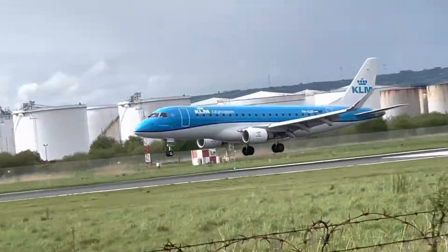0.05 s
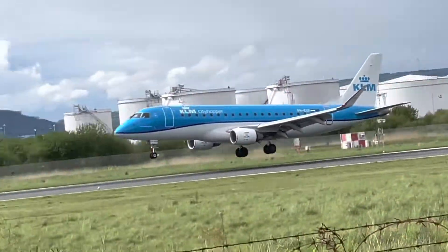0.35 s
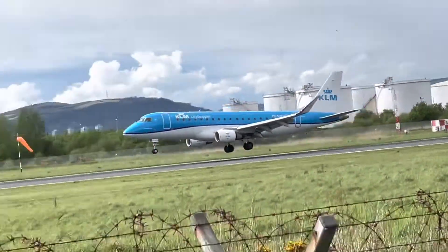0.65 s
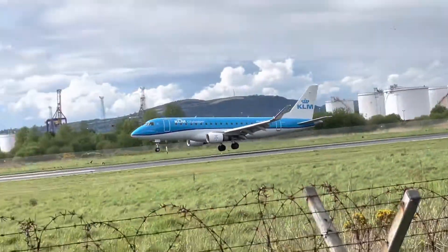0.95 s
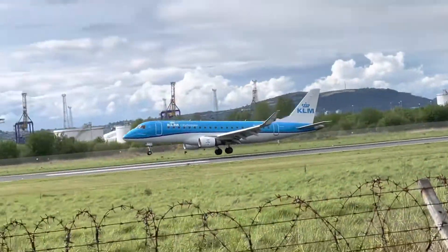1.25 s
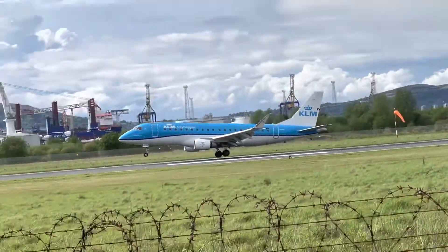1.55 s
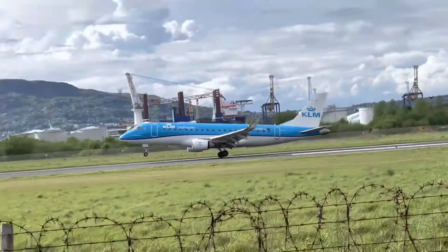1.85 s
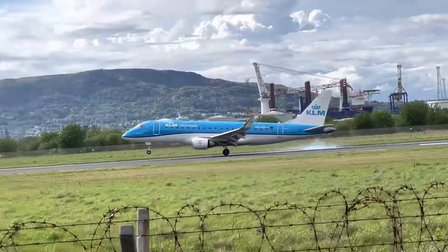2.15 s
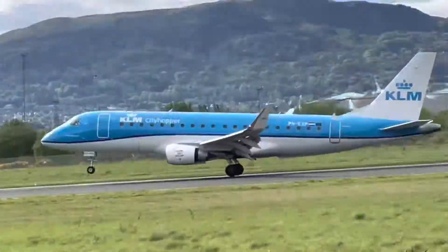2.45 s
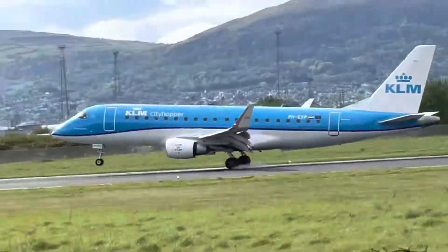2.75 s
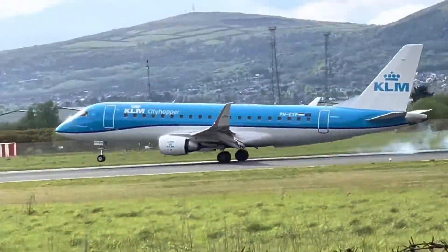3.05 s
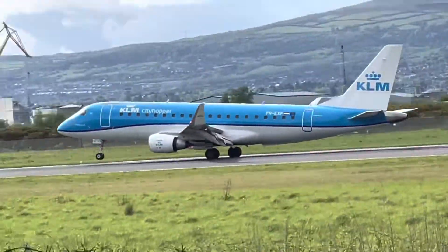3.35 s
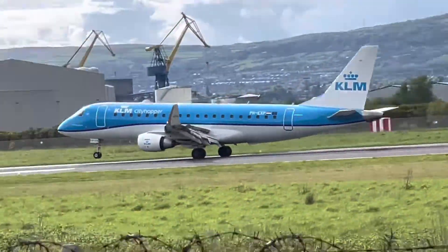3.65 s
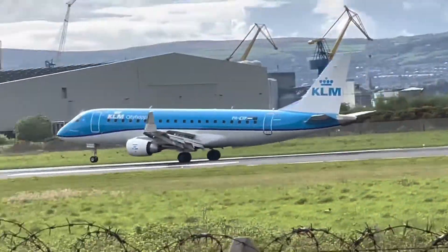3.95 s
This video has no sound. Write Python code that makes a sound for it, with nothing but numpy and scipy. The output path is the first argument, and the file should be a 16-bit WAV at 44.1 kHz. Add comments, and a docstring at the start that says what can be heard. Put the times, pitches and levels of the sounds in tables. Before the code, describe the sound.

A jet airliner roars throughout as it lands, heard from beside the runway, with faint high engine tones at first. From about 1 second a wavering whine slides down in pitch until the end at 4 seconds, while the roar swells a little and darkens. Wind rumbles on the microphone, with low buffeting gusts hardest from about 1.6 to 2.6 seconds, then easing.

```python
"""A jet airliner's roar swells over rumbling wind as it lands, heard from the grass by the runway.
The broadband noise of fans and exhaust darkens as it goes by, rippled by interference with the
ground echo, while the Doppler effect slides the engines' whine downward. Turbulent pressure on
the two microphone ports makes the rumble, and buffets them hardest halfway through."""
import sys
import numpy as np
from scipy import signal
from scipy.fft import rfft, irfft
from scipy.io import wavfile
from scipy.ndimage import uniform_filter1d

SR = 44100
rng = np.random.default_rng(int(sys.argv[2]) if len(sys.argv) > 2 else 0)


def dump_mix(stems):
    """Bounce the given channels to the path in sys.argv[1] as a 16-bit WAV at rate SR."""
    frames = np.atleast_2d(stems).T  # one column per channel
    limited = np.clip(frames, -1, 1)  # hard clip at full scale
    pcm = np.round(limited * 32767).astype(np.int16)
    wavfile.write(sys.argv[1], SR, pcm)


N = 176400
TIME_S = np.arange(N) / SR
ABEAM_S = .97  # the aircraft is closest to the listener


def amp(db):
    """Decibels as an amplitude ratio."""
    return 10 ** (np.asarray(db) / 20)


def unit_rms(x):
    """Normalisation to a mean power of one."""
    return x / np.sqrt(np.mean(x ** 2) + 1e-20)


def spectrum(points, hz):
    """Interpolation of a table on a logarithmic frequency axis."""
    table_hz, value = np.transpose(points)
    return np.interp(np.log(hz + 1), np.log(table_hz + 1), value)


def curve(points, t=TIME_S):
    """Linear interpolation of a table over time."""
    return np.interp(t, *np.transpose(points))


def noise(shape, size=N):
    """Spectral shaping: white noise weighted by shape(hz), at unit rms."""
    white = rfft(rng.standard_normal(size))
    return unit_rms(irfft(white * shape(np.fft.rfftfreq(size, 1 / SR)), size))


def wander(rate_hz):
    """Random modulation: Gaussian low-pass noise."""
    return noise(lambda hz: np.exp(-.5 * (hz / rate_hz) ** 2))


def add(mix, start_s, sound):
    """Superposition of a sound on the mix from start_s on."""
    part = mix[..., round(start_s * SR):][..., :sound.shape[-1]]
    part += sound[..., :part.shape[-1]]


# Faint ticks close by: start_s, level_db
TICKS = [(.4955, -42), (.506, -53), (.6325, -47)]

def ticks(pitch_hz=13300, decay_s=.00022):
    """Damped oscillation: each tick is a very short, high ring."""
    t, out = np.arange(256) / SR, np.zeros(N)
    ring = t / decay_s * np.exp(1 - t / decay_s) * np.sin(2 * np.pi * pitch_hz * t)
    for start_s, level_db in TICKS:
        add(out, start_s, amp(level_db) * ring)
    return out


# Spectrum of the small eddies: frequency_hz, relative_db
RUSTLE_SPECTRUM = [(40, -12), (110, 4.5), (200, -2.5), (400, -11), (750, -6.5), (1300, -16), (2000, -90),
                   (4000, -72)]
# Strength of the small eddies: time_s, level_db
RUSTLE_LEVEL = [(0, -39), (.6, -37), (1.3, -40), (1.7, -35), (1.9, -40), (2.2, -37), (2.55, -43),
                (2.75, -43.5), (3.1, -37.5), (3.5, -40), (4, -46.5)]

def rustle(swell_db=2, swell_hz=12):
    """Incoherence: eddies smaller than the port spacing give each port its own soft rush."""
    shape = lambda hz: amp(spectrum(RUSTLE_SPECTRUM, hz))
    pair = np.array([noise(shape) * amp(swell_db * wander(swell_hz)) for port in range(2)])
    return pair * amp(curve(RUSTLE_LEVEL))


def eddies(shape, side_gain, size=N):
    """Partial coherence: turbulent pressure of steady strength, partly different at each port."""
    mid, side = noise(shape, size), noise(shape, size)
    pair = mid + side_gain * np.array([side, -side])
    local_power = uniform_filter1d((pair ** 2).mean(0), size=1600, mode="wrap")
    return pair / np.sqrt(local_power + 0.15)


# Spectrum of the deep wind rumble: frequency_hz, relative_db
RUMBLE_SPECTRUM = [(15, -46), (32, -19), (52, 6.5), (70, 2), (95, -11), (135, -18), (250, -27), (600, -68),
                   (2000, -95)]
# Strength of the rumble: time_s, level_db
RUMBLE_LEVEL = [(0, -31.5), (.6, -29.5), (.8, -33.5), (1.0, -28.5), (1.4, -30.5), (1.6, -23.5), (1.85, -35),
                (1.95, -24), (2.15, -36), (2.35, -40), (2.58, -40), (2.72, -44), (3.1, -41), (3.5, -50),
                (4, -38)]
# Strength of the wind's higher flutter: time_s, level_db
FLUTTER_LEVEL = [(0, -42), (1.2, -39), (1.6, -40), (2.15, -29), (2.35, -36), (2.55, -32.5), (2.75, -43.5),
                 (3.2, -43), (3.5, -32), (4, -49)]

def wind(flutter_hz=86.7, flutter_octaves=.32, swell_db=2, swell_hz=9, side_gain=.35):
    """Turbulent pressure on the microphone: a rumble and a higher flutter that swell together."""
    rumble_shape = lambda hz: amp(spectrum(RUMBLE_SPECTRUM, hz))
    flutter_shape = lambda hz: np.exp(-.5 * (np.log2((hz + 1) / flutter_hz) / flutter_octaves) ** 2)
    rumble = eddies(rumble_shape, side_gain) * amp(curve(RUMBLE_LEVEL))
    flutter = eddies(flutter_shape, side_gain) * amp(curve(FLUTTER_LEVEL))
    return (rumble + flutter) * amp(swell_db * wander(swell_hz))


# Gusts on the microphone: start_s, length_s, level_db, upper_edge_hz
BUFFETS = [(1.075, .045, -28, 190), (1.185, .075, -17.5, 95), (1.635, .04, -21, 90),
           (1.714, .045, -13.5, 175), (1.775, .1, -15, 70), (1.855, .06, -23.5, 80),
           (2.0, .045, -20.5, 110), (2.088, .12, -14.5, 140), (2.158, .038, -11.5, 275),
           (2.198, .066, -27, 240), (2.264, .06, -19.5, 330), (2.32, .035, -27, 280),
           (2.402, .04, -22, 350), (2.438, .08, -22, 400), (2.509, .043, -28, 280), (2.542, .045, -20, 380),
           (2.558, .06, -21, 170), (2.915, .033, -33, 200), (3.17, .04, -29, 130), (3.432, .05, -24, 169),
           (3.602, .045, -24, 170)]

def buffets(rise_s=.0059, rolloff_order=3.2):
    """Pressure transients: each gust is a burst of low turbulence that rises fast and dies away."""
    t, out = np.arange(8192) / SR, np.zeros((2, N))
    for start_s, length_s, level_db, upper_hz in BUFFETS:
        lower_hz = .36 * upper_hz
        highpass = lambda hz: hz ** 3 / (hz ** 3 + lower_hz ** 3)
        band = lambda hz: highpass(hz) / np.hypot(1, (hz / upper_hz) ** rolloff_order)
        envelope = np.minimum(t / rise_s, 1) * np.exp(-2 * (t / length_s) ** 2)
        add(out, start_s, eddies(band, side_gain=.22, size=len(t)) * amp(level_db) * envelope)
    return out


# Level difference between left and right: frequency_hz, left_minus_right_db
STEREO_BALANCE = [(60, .3), (240, .3), (390, 1), (600, 0), (720, -3), (870, -3.8), (1050, -.8), (1400, 0)]
# Phase difference between left and right: frequency_hz, left_lead_rad
STEREO_PHASE = [(250, 0), (620, -.55), (950, -.1), (1250, -.3), (1600, 0), (2450, 0), (3100, .55),
                (4500, .32), (5300, .45), (5750, -1.55), (6700, -.8), (7200, -1.15), (7550, -2.3),
                (8000, -2.3), (8700, -3.14), (9400, -3.55), (11500, -5), (12600, -6.28)]

def stereo_image(sound):
    """Stereo image: level and phase differ left and right, varying with frequency."""
    hz = np.fft.rfftfreq(N, 1 / SR)
    left = amp(spectrum(STEREO_BALANCE, hz) / 2) * np.exp(.5j * spectrum(STEREO_PHASE, hz))
    return irfft(rfft(sound) * np.array([left, 1 / left]), N)


# Fan tones from ahead of the engines: start_s, length_s, pitch_hz, fall_hz_per_s, level_db
APPROACH_TONES = [(0, 0.49, 1180, 45, -38.5), (.2, .36, 3140, 400, -44), (.63, .14, 3275, 500, -39),
                  (.76, .16, 3310, 500, -44), (1.08, .32, 3080, 340, -47)]

def approach_tones(width_hz=12):
    """Forward radiation of the fans: brief, blurred tones that swell, sink in pitch and fade."""
    out = np.zeros(N)
    for start_s, length_s, pitch_hz, fall_hz_per_s, level_db in APPROACH_TONES:
        age_s = TIME_S - start_s
        cycles = np.cumsum(pitch_hz - fall_hz_per_s * age_s + width_hz * wander(2 * width_hz)) / SR
        envelope = np.sin(np.pi * np.clip(age_s / length_s, 0, 1))
        out += amp(level_db) * envelope * unit_rms(np.sin(2 * np.pi * cycles))
    return out


def blade_tone(cycles, width_hz, broadening, fading_db=2.8, fading_hz=35):
    """Scintillation: the air on the way blurs a tone's pitch and makes its level flutter."""
    jitter = np.cumsum(broadening * width_hz * wander(3 * width_hz)) / SR
    fading = amp(fading_db * wander(fading_hz))
    return unit_rms(fading * np.sin(2 * np.pi * (cycles + jitter)))


# Fan tones of the two engines: pitch_ratio, relative_db, base_width_hz
FAN_TONES = [(1, 0, 5), (1.044, -10.5, 7)]
# Strength of the fan tones: time_s, level_db
FAN_LEVEL = [(0, -72), (.87, -62), (.97, -43.5), (1.07, -54), (1.2, -44), (1.35, -44.5), (1.42, -35.5),
             (1.51, -41), (1.66, -40.5), (1.76, -45), (1.86, -41), (1.93, -54), (2.02, -37.5), (2.13, -50),
             (2.25, -37), (2.37, -57), (2.43, -36), (2.51, -46), (2.57, -37.5), (2.66, -45), (2.88, -50),
             (3.0, -38.5), (3.19, -57), (3.245, -30.5), (3.28, -33), (3.34, -45), (3.4, -37.5),
             (3.47, -36.5), (3.53, -48), (3.6, -37.5), (3.69, -45), (3.75, -38.5), (3.93, -36.3), (4, -46)]
# Pitch of the turbine's thin whistle over that of the whine: time_s, pitch_ratio
TURBINE_RATIO = [(2.1, 2.473), (2.6, 2.513), (3.0, 2.52), (3.4, 2.506), (3.85, 2.48)]
# Strength of that whistle: time_s, level_db
TURBINE_LEVEL = [(0, -80), (1.9, -77), (2.12, -62), (2.4, -68), (2.6, -56.5), (2.85, -68), (3.2, -66),
                 (3.4, -56.5), (3.6, -57), (3.72, -65), (4, -61)]
# Hoarse haze of scattered sound around the whine: time_s, level_db
HAZE_LEVEL = [(0, -73), (1.0, -51), (1.3, -50), (1.45, -35), (1.6, -46), (1.85, -42.5), (2.15, -48),
              (2.26, -34), (2.36, -56), (2.6, -47), (2.88, -45), (3.0, -52), (3.16, -54), (3.28, -39),
              (3.6, -51), (4, -48)]

def whine(abeam_hz=3587, doppler_swing=.265, distance_over_speed_s=1.25, haze_width_hz=210):
    """Doppler effect: fan tones, their haze and the turbine's whistle share one falling glide."""
    along = (TIME_S - ABEAM_S) / distance_over_speed_s
    pitch_hz = abeam_hz * (1 - doppler_swing * along / np.hypot(1, along))
    cycles = np.cumsum(pitch_hz) / SR
    broadening = 1 + 2.6 / (1 + along ** 2) ** 1.49  # tones blur most abeam
    fan = sum(amp(db) * blade_tone(ratio * cycles, width_hz, broadening)
              for ratio, db, width_hz in FAN_TONES)
    turbine_cycles = np.cumsum(pitch_hz * curve(TURBINE_RATIO)) / SR
    turbine = blade_tone(turbine_cycles, width_hz=15, broadening=broadening)
    phase = 2 * np.pi * cycles
    haze = unit_rms(wander(haze_width_hz) * np.sin(phase) + wander(haze_width_hz) * np.cos(phase))
    return (fan * amp(curve(FAN_LEVEL))
            + haze * amp(curve(HAZE_LEVEL))
            + turbine * amp(curve(TURBINE_LEVEL)))


def ground_echo_db(t, hz, delay_s=.00334, drift_s_per_s=.00019, depth_db=2, edge_hz=890):
    """Comb filtering: direct and ground-reflected sound interfere, rippling the low spectrum."""
    ripple = np.cos(2 * np.pi * hz * (delay_s + drift_s_per_s * t))
    return depth_db * ripple * np.exp(-.5 * (hz / edge_hz) ** 2)


# Strength of the howl in the roar: time_s, boost_db
HOWL_BOOST = [(0, 0.5), (1.1, 3), (1.6, 4.5), (2, 4), (2.3, 5.8), (2.75, 7.3), (3.3, 4.5), (4, 1)]

def howl_db(t, hz, abeam_hz=1040, fall_hz_per_s=54, width_hz=124):
    """Band emphasis: a broad, sinking peak in the noise spectrum is heard as a howl."""
    centre_hz = abeam_hz - fall_hz_per_s * (t - ABEAM_S)
    return curve(HOWL_BOOST, t) * np.exp(-.5 * ((hz - centre_hz) / width_hz) ** 2)


# The roar's six bands, low to high: centre_hz
BAND_CENTRES = [130, 420, 1000, 2000, 5500, 11000]
# Deep exhaust rumble, growing behind the aircraft: time_s, relative_db
DEEP_BAND = [(0, -7), (1.3, -2), (2.2, 5), (2.55, 2), (2.75, -2), (3.1, 7), (3.5, 10), (4, -8)]
# Low roar of the exhaust: time_s, relative_db
EXHAUST_BAND = [(0, -33), (.3, -33.5), (.6, -29.5), (1.4, -30.5), (2.2, -29), (2.75, -35), (3.15, -33.5),
                (3.5, -25), (3.7, -29.5), (4, -28)]
# The next three bands, each on its own relative scale: time_s, middle_db, upper_middle_db, treble_db
MIDDLE_BANDS = [(0.0, -42.5, -39, -57), (0.07, -35.5, -39, -53.5), (0.23, -38, -33, -42),
                (0.29, -37, -30.5, -46.5), (0.46, -36.5, -35, -46), (0.55, -33.5, -29.5, -43.5),
                (0.57, -36, -30.5, -41.5), (0.62, -34.5, -32, -47.5), (0.68, -36.5, -31.5, -44),
                (0.8, -33, -34, -50.5), (0.94, -34.5, -34.5, -47.5), (1.1, -32.5, -35, -52),
                (1.4, -31.5, -31.5, -48), (1.62, -30, -34, -48), (1.83, -33, -38.5, -56),
                (2.13, -30.5, -35.5, -48), (2.21, -32, -35, -51), (2.23, -32, -34, -50),
                (2.24, -27.5, -36, -46.5), (2.27, -29, -31, -48.5), (2.31, -33, -36, -52),
                (2.43, -30.5, -36.5, -50), (2.64, -32.5, -35, -49), (2.7, -30, -34, -49),
                (2.73, -32, -35, -52.5), (2.9, -32, -36, -49), (2.92, -35, -37, -55.5),
                (3.06, -33, -35.5, -49), (3.12, -35, -39, -55.5), (3.29, -29, -33, -48.5),
                (3.37, -34, -35.5, -52), (3.5, -30.5, -32.5, -53), (3.57, -31, -40, -51),
                (3.63, -27.5, -34.5, -53), (3.64, -30.5, -37, -54), (3.97, -33, -40.5, -51.5)]
# Highest hiss: time_s, relative_db
HISS_BAND = [(0, -6), (.25, 4.5), (.45, -1), (.56, 10), (.8, 3), (.95, 8), (1.15, 4.5), (1.45, 10.5),
             (1.65, 7), (1.85, -2), (2.15, 10.5), (2.35, 6.5), (3.0, 9), (3.15, 5), (3.35, 11.5), (3.72, 2),
             (4, 13.5)]

def band_swell_db(t, hz):
    """Amplitude modulation by band: each swings about its mean level, blending into its neighbours."""
    time_s, *middle_bands = np.transpose(MIDDLE_BANDS)
    middle = [np.interp(t, time_s, band) for band in middle_bands]
    levels = [curve(DEEP_BAND, t), curve(EXHAUST_BAND, t), *middle, curve(HISS_BAND, t)]
    weights = [spectrum(list(zip(BAND_CENTRES, row)), hz) for row in np.eye(len(levels))]
    return sum((level - level.mean()) * weight for level, weight in zip(levels, weights))


# Base spectrum of the roar: frequency_hz, relative_db
ROAR_SPECTRUM = [(30, -13), (120, -8.5), (260, -8.5), (400, 0), (550, -1), (680, -1), (850, -2.5),
                 (1050, -0.5), (1280, -1), (2000, -5), (3200, -10.5), (4000, -18), (4600, -26),
                 (6300, -27.5), (7600, -23.5), (10000, -31), (12000, -40.5), (14000, -68.5)]
# Likeness of the roar left and right, narrowing to the centre near 2 kHz: frequency_hz, coherence_ratio
ROAR_COHERENCE = [(100, .93), (500, .97), (1200, .99), (1900, .999), (2400, .999), (3200, .98), (4200, .95),
                  (5500, .95), (7500, .965), (12000, .95)]

def roar(level_db=-26.5, patch_db=.96, flicker_db=.5):
    """Aerodynamic noise: the broadband rush of fans and exhaust, made patchy by moving air."""
    window, hop = 1024, 256
    frames, hz = N // hop + 5, np.fft.rfftfreq(window, 1 / SR)
    t = np.arange(frames)[:, None] * hop / SR
    mid_re, mid_im, side_re, side_im, patches = rng.standard_normal((5, frames, len(hz)))
    patches = uniform_filter1d(patches, size=12, axis=0)  # smooth over time
    patches = unit_rms(uniform_filter1d(patches, size=9, axis=1))  # and over frequency
    flicker = unit_rms(uniform_filter1d(rng.standard_normal(frames), size=6))[:, None]
    coherence = np.clip(spectrum(ROAR_COHERENCE, hz), 0, 1)
    mid = np.sqrt(1 + coherence) * (mid_re + 1j * mid_im)
    side = np.sqrt(1 - coherence) * (side_re + 1j * side_im)
    colour_db = spectrum(ROAR_SPECTRUM, hz) + band_swell_db(t, hz)
    colour_db += howl_db(t, hz) + ground_echo_db(t, hz)
    gain = amp(colour_db + patch_db * patches + flicker_db * flicker)
    spectra = np.array([mid + side, mid - side]) * gain
    _, pair = signal.istft(spectra.transpose(0, 2, 1), nperseg=window, noverlap=window - hop)
    return amp(level_db) * unit_rms(pair[:, :N])


def scene():
    """Superposition of the distant airliner, the wind at the microphone and the close ticks."""
    airliner = stereo_image(roar() + whine() + approach_tones())
    return airliner + wind() + rustle() + buffets() + ticks()


def record(dry, cutoff_hz=14700):
    """Band limiting: the recorder's low-pass filter removes the highest treble."""
    lowpass = signal.firwin(511, cutoff_hz, window=("kaiser", 9), fs=SR)
    return signal.oaconvolve(dry, lowpass[None], "same")


dry = scene()
out = record(dry)
dump_mix(out)
```